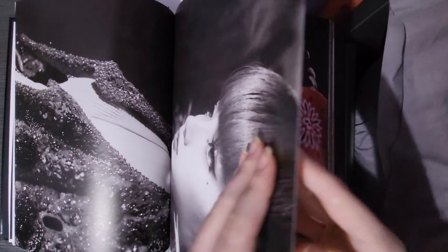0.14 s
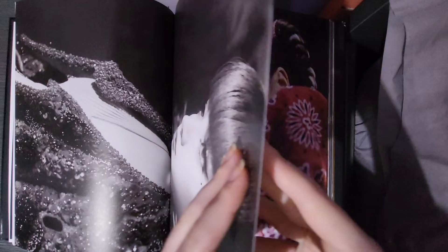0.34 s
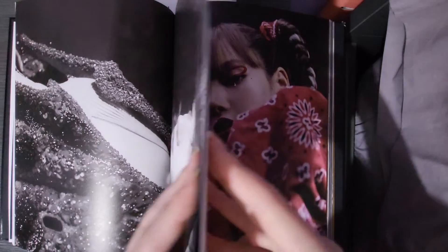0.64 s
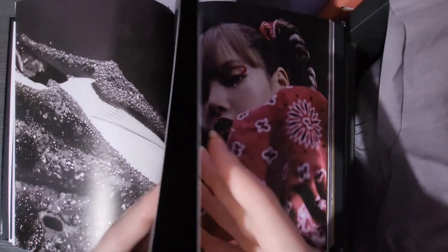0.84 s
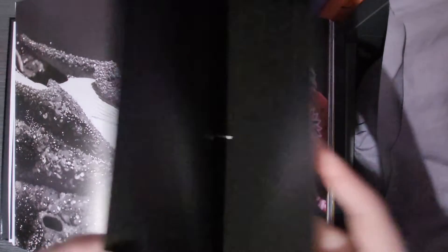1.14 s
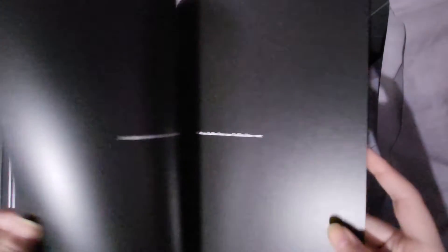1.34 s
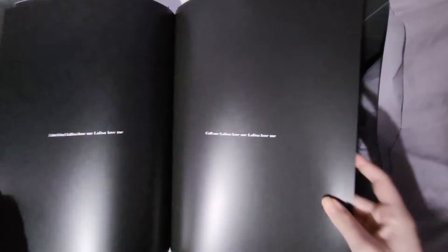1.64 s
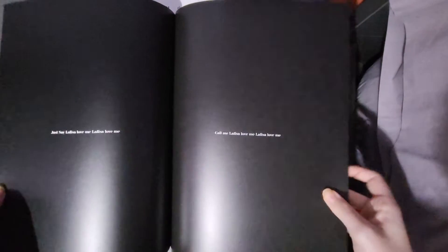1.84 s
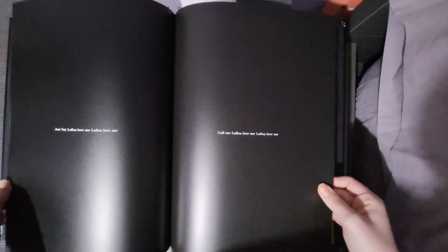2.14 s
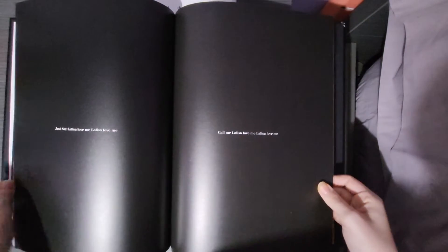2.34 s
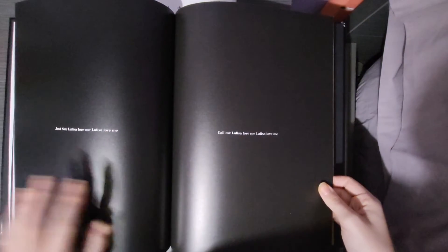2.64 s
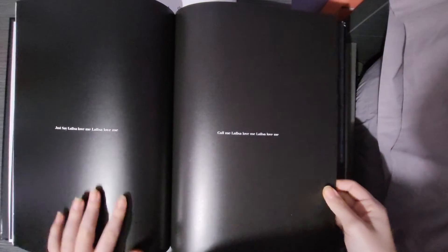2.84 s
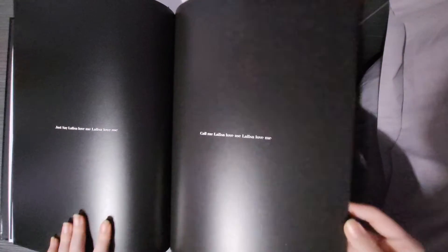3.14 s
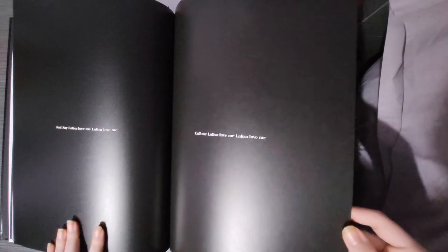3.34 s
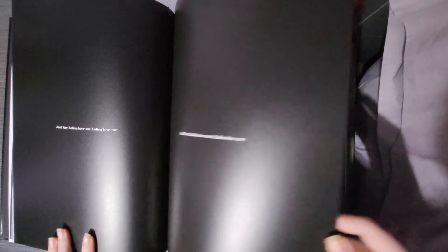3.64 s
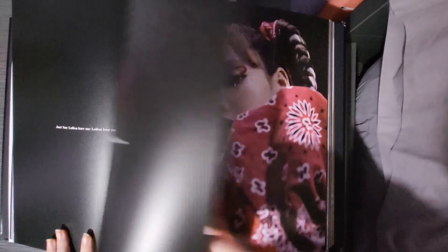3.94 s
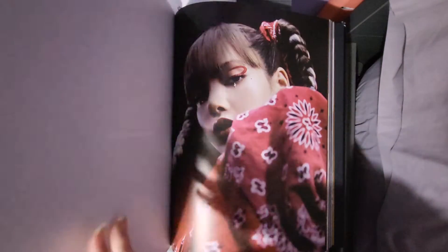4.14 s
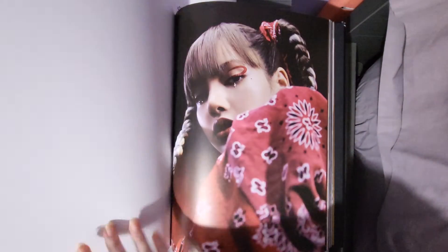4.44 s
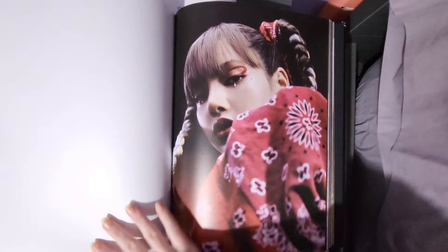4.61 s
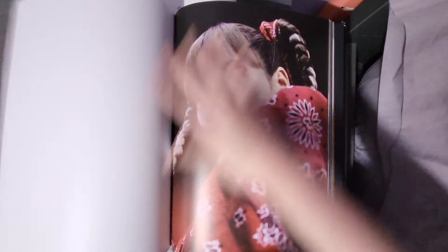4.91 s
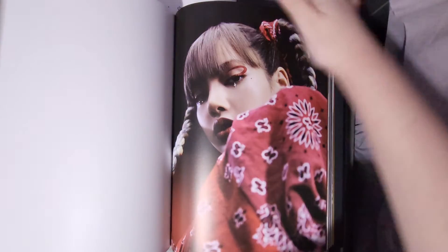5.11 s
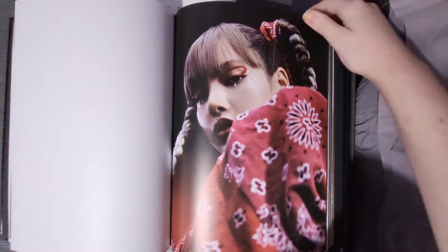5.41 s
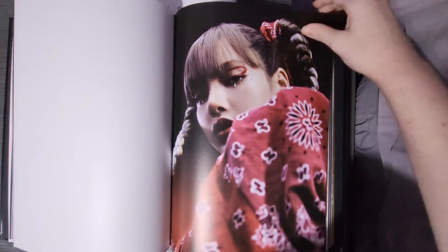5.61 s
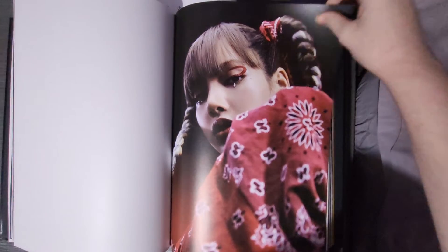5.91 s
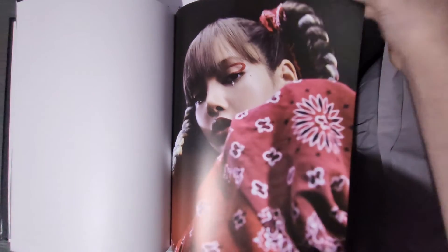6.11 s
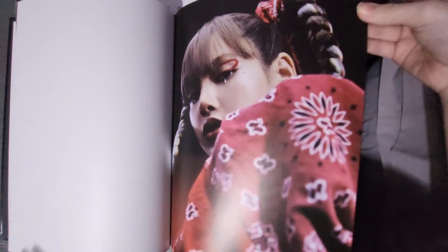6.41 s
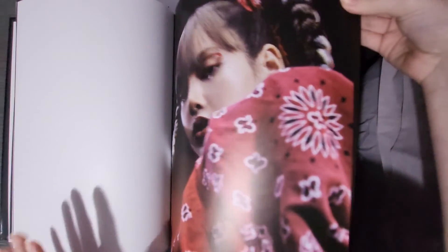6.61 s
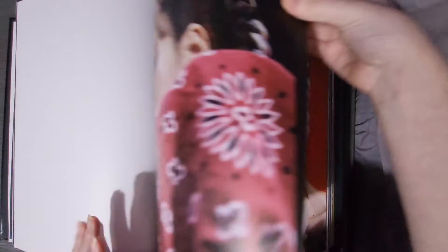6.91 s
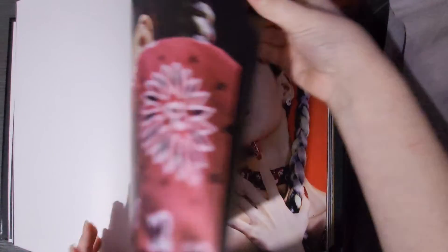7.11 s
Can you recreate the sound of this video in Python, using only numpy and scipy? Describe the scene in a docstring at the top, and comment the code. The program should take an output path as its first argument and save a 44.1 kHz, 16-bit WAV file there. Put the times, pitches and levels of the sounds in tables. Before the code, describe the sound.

Close stereo pickup of hands turning stiff glossy pages on a bed in a quiet room with faint hiss. An unsteady low hum swells under soft rubbing and small ticks and bends. A hard papery snap comes around three seconds, then a loud hollow flop just after four, followed by light finger strokes and a short falling peel swish near the end.

```python
"""Hands turn heavy glossy pages of a book on a bed, under a two-port microphone, in faint room hiss.
First a low, unsteady hum near 50 Hz swells and fades under soft strokes: rubbed gloss, as shaped noise.
Faint bends (lumpy noise, thumps), pops (short resonances) and ticks come early, stronger from about 1.2 s.
The sheet flexes hard at 3.1 s and flops down near 4.2 s with a hum swell; lighter handling follows.
Near 6.6 s one page peels off the next: a noise resonance slides down; small strokes end the scene."""
import sys
import numpy as np
from scipy import signal
from scipy.fft import rfft, irfft, next_fast_len
from scipy.io import wavfile
from scipy.ndimage import uniform_filter1d, map_coordinates

SR = 44100
rng = np.random.default_rng(int(sys.argv[2]) if len(sys.argv) > 2 else 0)


def waveform_to_disk(signal):
    """Save audio, clipped to [-1, 1], as 16-bit WAV at the path in sys.argv[1]."""
    frames = np.transpose(np.atleast_2d(signal))
    scaled = np.clip(frames, -1, 1) * 32767
    samples = np.round(scaled).astype(np.int16)
    wavfile.write(sys.argv[1], SR, samples)


N = 320166

# Levels and widths in the tables are nominal: each source adds its own fixed trim.
# Room spectrum: freq_hz, density_db_per_hz (relative)
ROOM_SPECTRUM = [(18, -33), (30, -3), (59, -10.5), (85, -14), (230, -43.5), (269, -33.5), (530, -33.5),
                 (707, -34.5), (918, -38), (5010, -45), (6340, -42), (7040, -41.5), (15400, -43.5)]
# Room correlation between the ports: freq_hz, likeness (-1 to 1)
ROOM_LIKENESS = [(60, 0.22), (240, 0.6), (950, 0.2), (3770, -0.59), (15000, 0.21)]
# Hum swells: start_s, hold_s, level_db, rise_s, fall_s, pitch_hz
HUM_SWELLS = [(0, 0, -46.5, .1, .2, 46.3), (0.326, 0.12, -56, .12, .1, 50.7),
              (0.551, 0.019, -47.5, 0.26, .12, 49.9), (0.68, 0.086, -48.5, .15, .08, 47.9),
              (0.886, .04, -52.5, .04, .064, 48), (1.149, 0, -59, .4, .1, 49.5),
              (1.27, 0.0044, -47, .2, .09, 50.9), (1.43, 0.019, -56, .16, .5, 48.2),
              (1.681, 0, -59, .4, .13, 49.4), (2.016, 0.043, -50, .11, .05, 49),
              (2.4, 0, -60.5, .13, .2, 49.2), (2.591, 0, -59, .12, .046, 49.3),
              (2.745, 0.14, -60, .045, .1, 49), (3.061, 0.27, -64, .03, .05, 50.5),
              (3.481, 0, -61.5, .08, .13, 53.8), (3.884, 0.048, -63.5, .2, .09, 50.8),
              (4.159, 0.051, -57.5, .1, .1, 55.3), (4.33, 0.0087, -37, .02, .04, 58.5),
              (4.591, 0, -66.5, .35, .6, 55.6), (5.296, .14, -71, 0.58, 0.034, 48.84),
              (5.82, 0, -64, 0.19, 0.048, 53.26), (5.99, 0, -65, 0.093, .24, 57.8),
              (6.53, 0, -66, 0.13, 0.19, 47.7), (6.75, 0.01, -69, .11, 0.12, 50.5),
              (6.96, 0, -61.5, 0.13, .12, 55.1), (7.14, 0, -70.5, 0.32, 0.063, 50.5)]
# Fingertips at the page edge: start_s, peak_db, treble_db (over peak), t60_s, left_right_db
EDGE_TICKS = [(0.4436, -93, -18, 0.033, -81), (0.6868, -60.5, 19, 0.087, -0.5),
              (0.848, -68.5, -41, 0.07, -19), (1.3139, -43.5, -33, 0.099, 3),
              (1.4259, -51.5, -37, 0.0713, 1), (1.744, -55.5, -4, 0.16, 2), (1.8078, -58, -16, 0.063, -3),
              (2.3814, -68, -23, 0.059, 13), (2.4223, -49.5, -5.5, 0.023, 0),
              (2.7826, -65.5, 17, 0.025, 11.5), (3.2414, -53, -22, 0.14, 9.5),
              (3.9639, -53.5, -19, 0.094, 1), (4.0647, -57, -11, 0.0693, 8),
              (4.0778, -44.5, -21, 0.035, -1), (4.135, -41, -1.5, 0.029, -5.5),
              (4.2849, -56.5, -6, 0.07, 6.5), (5.432, -66, 2.5, 0.087, 12), (5.7907, -68, 13, 0.064, 11),
              (6.0496, -65.5, 13, 0.034, 14.5), (6.1609, -53.5, -8, 0.1, 2),
              (6.1994, -48.5, -1.5, 0.026, 4), (6.2399, -50.5, -9.5, 0.07, 3.5), (7.0911, -70, 4, 0.07, 4)]
# Sheet pops: start_s, peak_db, pitch_hz, t60_s, left_right_db
SHEET_BUCKLES = [(0.441, -64, 153, 0.15, -12.5), (1.158, -58, 710, 0.069, 0), (1.315, -57, 138, 0.06, -19),
                 (1.419, -55, 145, 0.075, 7), (1.484, -56.5, 187, 0.043, 2.5), (1.568, -55, 126, 0.02, -5),
                 (1.779, -54.5, 435, 0.1, -6), (3.148, -31, 705, 0.1, 1.5), (3.164, -32.5, 712, 0.027, 8),
                 (3.207, -49.5, 680, 0.11, 4.5), (3.246, -47.5, 770, 0.042, -2),
                 (3.849, -55, 743, 0.11, -1), (3.959, -47.5, 435, 0.05, -2), (4.143, -28, 334, 0.038, -2),
                 (4.154, -19.5, 197, 0.11, 1), (4.216, -30.5, 140, 0.081, 3), (4.227, -37, 815, 0.05, 9.5),
                 (4.249, -38, 390, 0.075, 8), (4.267, -37.5, 328, 0.071, 7), (4.29, -39, 348, 0.12, -0.5),
                 (4.756, -62, 133, 0.14, -4), (4.917, -51.5, 355, 0.11, -10),
                 (7.214, -59.5, 736, 0.064, -2)]
# Pages part: start_s, hold_s, level_db, rise_s, fall_s
PAGE_PARTINGS = [(6.643, 0.11, -36.5, 0.036, 0.084), (6.845, 0.0069, -50, 0.02, 0.024)]
# Sheet bends: start_s, hold_s, body_db, rise_s, fall_s, centre_hz, thump_db (over body)
SHEET_BENDS = [(0, 0, -83.5, .01, .1, 900, 27.5), (.148, 0, -70.5, .09, .15, 960, 5.5),
               (.55, 0, -81.5, 3, 3, 1350, 8.5), (.842, 0.006, -83.5, .17, 0.47, 1046, -14),
               (1.172, 0, -51.5, .036, 0.176, 857, -36), (1.338, 0.024, -66, .3, .11, 1000, 3),
               (1.424, 0, -56, .01, .09, 800, -1), (1.574, 0.0081, -60.5, .006, .065, 730, 5.5),
               (1.786, 0.015, -58, .046, 0.076, 600, -3.5), (1.89, 0.26, -72, .05, .05, 1550, -6),
               (2.07, 0, -75.5, .05, .05, 333.5, 9.5), (2.41, 0, -77.5, .11, .14, 1596, -15),
               (2.834, .06, -71.5, .165, .116, 1457, -4), (3.076, 0.021, -69.5, .045, 0.17, 1444, 4.5),
               (3.142, 0.012, -34, .009, 0.044, 710, -15), (3.251, 0, -50.5, .04, .053, 796, -8.5),
               (3.32, 0.011, -82.5, .1, .15, 900, 5.5), (3.827, .11, -66.5, .1, .1, 750, 0),
               (3.981, 0, -59, .1, .1, 526, -12.5), (4.07, 0.036, -68, 0.055, 0.052, 1170, -4.5),
               (4.14, 0, -40, .002, .05, 524, 7), (4.164, 0, -40, .018, .058, 581, -12),
               (4.232, 0, -36, .06, .07, 554, -2.5), (4.29, 0.0098, -39, .014, 0.074, 374, -3.5),
               (4.716, 0, -76.5, .4, .6, 789, 10), (4.925, 0, -48.5, .008, 0.097, 420, -6.5),
               (4.99, .05, -59, .05, 0.039, 430, -21), (6.07, 0.094, -73.5, .07, .05, 1450, -9.5),
               (6.66, 0.15, -50, .06, .2, 967, -36), (6.72, 0.083, -48.5, .15, 0.053, 1240, -16.5),
               (6.9, 0, -63, .1, .25, 820, -0.5), (7.15, 0.0048, -80.5, .5, 0.21, 1465, -3),
               (7.235, .03, -73.5, .3, .1, 720, -3)]
# Sheet resonances over the book: centre_hz, width_hz, gain_db
SHEET_MODES = [(350, 52, 6.5), (719, 54, 2.5), (1124, 200, -12.5), (1630, 200, -11)]
# Rubbing: start_s, hold_s, swish_db, drift_db (over the hold), rise_s, fall_s, rasp_db (over swish),
# rasp_centre_hz, sheen_db (over swish), rasp_left_right_db
RUB_STROKES = [(0.101, 0.011, -77, 6, 0.41, .38, 1, 1753, -3, -1.5),
               (.445, 0.039, -79.5, -5, 0.029, .09, 4.5, 1880, 0, -5),
               (.693, 0.005, -75.5, -0.5, .06, .08, -3.5, 1580, 0.5, -2),
               (0.858, 0.2, -83, 14, 0.062, .3, -9.5, 1900, 7, -24),
               (1.135, 0.042, -67, 15, .13, .015, 1.5, 1998, -7.5, 3),
               (1.195, 0.13, -66, -1, .02, .15, 0.5, 2300, -6.5, 7.5),
               (1.424, 0, -67, 0.5, 0.01, .13, 6, 2340, -5.5, 4.5),
               (1.574, 0, -66.5, -0.5, 0.017, .08, 2, 1967, -12, 4),
               (1.773, 0.0079, -57, -0.5, 0.028, .09, -2.5, 2900, -4.5, 4),
               (1.862, 0.12, -72.5, 6.5, .3, .05, -2.5, 3200, -3.5, -4),
               (2.06, .12, -59, -7, .1, 0.054, 0.5, 2056, -1.5, -0.5),
               (2.388, .02, -74.5, 6.5, 0.0033, .05, -7, 3100, -1, 6),
               (2.421, 0, -64.5, 1.5, .04, .08, -6, 3400, -4.5, -4),
               (2.506, 0.32, -88, -2.5, .1, .1, -4.5, 2500, 2, 3),
               (2.788, 0.26, -63.5, -3.5, .025, .2, -10, 3600, -0.5, 1),
               (3.043, 0.012, -64, -0.5, .04, .03, 1, 3000, -7, -2),
               (3.08, 0.12, -63, 0.5, .2, .4, -10, 1529, -3, 0),
               (3.45, 0.31, -71.5, 1.5, 0.2, .03, -14.5, 2300, -4.5, -2),
               (3.973, 0.033, -73, -4, 0.19, 0.035, 1.5, 1886, -5.5, 1),
               (4.07, 0.0064, -74, 5, .03, .05, 9.5, 2250, -6, -1.5),
               (4.138, 0.012, -58.5, -3, .002, .04, -0.5, 1600, -4, 15),
               (4.164, 0.00093, -73.5, -2.5, 0.014, .076, 18.5, 1550, -6, 0),
               (4.194, .32, -72.5, 2, .03, .12, -6.5, 3200, -1.5, 0),
               (4.599, .09, -72.5, 2, .05, .1, -5, 2400, -6.5, 1),
               (4.754, 0.086, -66.5, 8, 0.07, .03, -15, 4060, -1.5, 1),
               (4.884, .054, -57.5, -1, 0.066, .023, -9, 3698, 7, 1.5),
               (4.96, 0.019, -74, 1, 0.011, .34, -9.5, 2700, -2.5, -1),
               (5.187, 0.099, -83.5, 2.5, .4, .65, -8.5, 3000, 0, -3),
               (5.785, 0.039, -87.5, -1.5, .06, .1, -6.5, 2800, -3, -3),
               (6.051, 0.081, -68.5, 4, 0.015, .033, -6, 3340, -6.5, 1.5),
               (6.2, 0.021, -61.5, 0, 0.0727, 0.11, -2.5, 2500, -4.5, -2),
               (6.262, 0.18, -67, 5, .05, 0.048, -19.5, 4180, -1.5, -2.5),
               (6.66, 0.044, -45.5, 1, .035, .11, -4, 2584, -12, -0.5),
               (6.76, .1, -64.5, -7.5, 0.16, .03, 11.5, 2301, -12.5, -11),
               (6.898, 0.14, -73, -1.5, .3, .05, 6, 3700, -10, 4),
               (7.083, 0.087, -69.5, -1, .012, .25, 3, 3300, -10, 1) ]
# Rubbing spectra, coarse to fine: freq_hz, density_db_per_hz (relative)
RASP_SPECTRUM = [(760, -35.5), (1300, -5.5), (1400, -5), (1680, 0), (1850, -8.5), (2000, -2), (2730, -4.5),
                 (3310, -4), (4600, -4.5), (5980, -29.5), (10100, -120)]
SWISH_SPECTRUM = [(2060, -38.5), (3500, -13), (3820, -3.5), (4440, 0), (6160, 0), (6590, 0), (7390, 2),
                  (8250, -8), (9000, -8), (11700, -25), (19800, -120)]
SHEEN_SPECTRUM = [(5000, -35), (8500, -4), (9270, 1), (12900, -4), (15400, -8.5)]
# Source position: time_s, left_lead_ms, side_over_mid_db
SOURCE_PATH = [(0, .21, -2.5), (.49, .22, 4), (.7, .39, -0.5), (1.3, -0.093, -1.5), (1.45, -.13, -5),
               (2.1, 0, -4.5), (3.7, 0.056, -2), (4.11, .2, -0.5), (4.13, .074, 6.5), (4.3, -.02, 3),
               (4.4, -.1, -3), (4.9, 0, -4.5), (5.6, -.1, -0.5), (6.2, -.05, 0), (6.4, .27, -2),
               (7.26, .2, -1.5)]
# Port mismatch, for swish and sheen: freq_hz, left_right_db
PORT_MISMATCH = [(60, 2), (110, 2), (200, -3.5), (380, 5.5), (700, 7), (1290, 8), (2380, 3), (4400, 2),
                 (8120, 4.5), (15000, -0.5)]

ROOM_DB, TOP_HZ = -78.5, 15450
HUM_REST_DB, HUM_REST_HZ = -78.21, 53
WAVER_DB, WAVER_HZ = 6.435, 1.8  # per unit of wobble
THUMP_REST_DB = -82  # the air never lies quite still under the hands
GAP_HZ, GAP_FALLS_HZ_PER_S, GAP_OPEN_HZ = 5300, 22000, 2843  # at first parting, fall, lowest
SHEEN_TILT_DB_PER_OCT_PER_DB = 0.46  # stronger sheen is brighter
SCATTER_RAD = 1.606  # pi / 2: side unrelated to mid
SWING_DB = 20  # crossed in one rise or fall time
CONTROL_HZ = 2000  # gesture rate


def amp(db):
    """Gain of a level in dB."""
    return 10 ** (np.asarray(db) / 20)


def unit(x):
    """Scale to rms 1."""
    return x / np.sqrt(np.mean(x ** 2) + 1e-20)


def along(points, hz):
    """Interpolate (Hz, value) points on a log axis."""
    point_hz, values = np.transpose(points)
    return np.interp(np.log(hz + 1), np.log(point_hz + 1), values)


def filtered(x, response):
    """Multiply the spectrum of x by a response of frequency."""
    size = next_fast_len(x.shape[-1] + 4096)
    spectrum = rfft(x, size) * response(np.fft.rfftfreq(size, 1 / SR))
    return irfft(spectrum, size)[..., :x.shape[-1]]


def resonance(hz, centre_hz, sharp):
    """Causal resonance of Q sharp, gain 1 at its centre."""
    damping = 1j * hz * centre_hz / sharp
    return damping / (centre_hz ** 2 - hz ** 2 + damping)


def noise(gain, patchy_db, grit_db, size=512):
    """Two unrelated noises, coloured by gain(Hz, s) at constant power, with long thin streaks and grit."""
    slips = unit(uniform_filter1d(rng.standard_normal(N), 90))  # about 2 ms long
    gritty = rng.standard_normal((2, N)) * amp(grit_db * slips)
    hz, t, z = signal.stft(gritty, SR, nperseg=size)
    shape = gain(hz[:, None], t) * np.ones(z.shape[1:])
    shape = shape / np.sqrt(np.mean(np.abs(shape) ** 2, 0))
    streaks = uniform_filter1d(rng.standard_normal(z.shape[1:]), size=4, axis=0)
    streaks = unit(uniform_filter1d(streaks, size=24, axis=1))
    z = z * shape * amp(patchy_db * streaks)
    return unit(signal.istft(z, SR, nperseg=size)[1][:, :N])


def placed(pair, wider_db, pan_db=0):
    """Mid and side become left and right; the nearer port hears first."""
    n = np.arange(N)
    time_s, lead_points_ms, side_points_db = np.transpose(SOURCE_PATH)
    lead_ms = np.interp(n / SR, time_s, lead_points_ms)
    side_db = np.interp(n / SR, time_s, side_points_db)
    turned = filtered(pair[0], lambda hz: 1j)  # mid, turned a quarter cycle
    # mostly unrelated noise, with a faint copy of the turned mid
    side = np.cos(SCATTER_RAD) * turned + np.sin(SCATTER_RAD) * pair[1]
    side = side * amp(side_db + wider_db)
    shift = lead_ms * SR / 2000  # half the lead per port, in samples
    left = map_coordinates(pair[0] + side, [n + shift], mode="nearest")
    right = map_coordinates(pair[0] - side, [n - shift], mode="nearest")
    return np.array([left * amp(pan_db / 2), right * amp(-pan_db / 2)])


def gestures(start_s, hold_s, level_db, rise_s, fall_s, drift_db=0):
    """Power of each gesture: rise, hold that may drift, fall; straight lines in dB."""
    t = np.arange(N * CONTROL_HZ // SR) / CONTROL_HZ - start_s[:, None]
    hold_s = np.maximum(hold_s, 1e-4)[:, None]
    before = np.clip(-t, 0, None) / np.maximum(rise_s, 1e-3)[:, None]
    after = np.clip(t - hold_s, 0, None) / np.maximum(fall_s, 1e-3)[:, None]
    drift = np.reshape(drift_db, (-1, 1)) * np.clip(t / hold_s, 0, 1)
    track_db = level_db[:, None] + drift - SWING_DB * (before + after)
    return 10 ** (np.maximum(track_db, -200) / 10)


def power_mean(power, values):
    """Mean of the gestures' values, weighted by power: the loudest prevails."""
    return values @ power / power.sum(0)


def at(track, t=None):
    """Read a gesture track at given times, or at every sample."""
    t = np.arange(N) / SR if t is None else t
    return np.interp(t, np.arange(len(track)) / CONTROL_HZ, track)


def wobble(knots_per_s):
    """Smooth random curve at the gesture rate."""
    knots = rng.standard_normal(40 * N // SR)
    position = np.arange(N * CONTROL_HZ // SR) * knots_per_s / CONTROL_HZ
    return map_coordinates(knots, [position])


def page(hz):
    """The sheet favours its resonances and radiates little above the last one."""
    peaks = 0
    for centre_hz, width_hz, gain_db in SHEET_MODES:
        peaks = peaks + amp(gain_db) * np.abs(resonance(hz, centre_hz, centre_hz / width_hz))
    return (0.58 + peaks) / (1 + (hz / 2100) ** 6)


def bursts(rows, colour, rise_s):
    """Short noise puffs, each with its own colour, decay and side."""
    out = np.zeros((2, 2, N + SR))  # port, mid / side, sample
    t = np.arange(SR // 4) / SR
    for start_s, peak_db, tone, t60_s, pan_db in rows:
        envelope = amp(-60 * t / max(t60_s, .004)) * (1 - np.exp(-t / rise_s))
        puff = filtered(rng.standard_normal((2, len(t))) * envelope, colour(tone))
        puff = amp(peak_db) * puff / np.abs(puff[0]).max()
        pan = amp(np.reshape([pan_db / 2, -pan_db / 2], (2, 1, 1)))
        out[:, :, round(start_s * SR):][..., :len(t)] += puff * pan
    return np.array([placed(out[k, :, :N], wider_db=-3.5)[k] for k in range(2)])


def room():
    """Steady noise above 65 Hz; its likeness at the two ports varies with frequency."""
    def colour(hz):
        turn = np.arccos(np.clip(along(ROOM_LIKENESS, hz), -1, 1)) / 2
        return amp(along(ROOM_SPECTRUM, hz)) * (hz > 65) * [np.cos(turn), np.sin(turn)]

    mid, side = filtered(rng.standard_normal((2, N)), colour)
    return amp(ROOM_DB) * unit(np.array([mid + side, mid - side]))


def hum():
    """A low tone swells, wavers in level and pitch between swells, and lags at the left port."""
    *shape, pitch_hz = np.transpose(HUM_SWELLS)
    power = gestures(*shape)
    rest = amp(2 * (HUM_REST_DB + WAVER_DB * wobble(5.5)))
    rest_hz = HUM_REST_HZ + WAVER_HZ * wobble(5)
    total = power.sum(0) + rest
    heard_hz = (pitch_hz @ power + rest * rest_hz) / total
    phase_rad = 2 * np.pi * np.cumsum(at(heard_hz)) / SR + np.array([[-.6], [.6]])
    return at(np.sqrt(2 * total)) * np.sin(phase_rad) * amp([[-.8], [.8]])


def ticks():
    """Fingertips catch and leave the page edge: puffs with a middle and a treble resonance."""
    def colour(treble_db):
        treble = amp(treble_db - 3.0)
        return lambda hz: resonance(hz, 1880, sharp=0.91) + treble * resonance(hz, 9000, sharp=1.0)

    return bursts(EDGE_TICKS, colour, rise_s=0.0004)


def buckles():
    """The stiff sheet pops between curves: a few cycles of one tone, the page's voice above it."""
    def colour(pitch_hz):
        def response(hz):
            above = page(hz) * (1j * hz / (.7 * pitch_hz + 1j * hz)) ** 3
            voice = resonance(hz, pitch_hz, sharp=6.6) + amp(-16.5) * above
            return voice / (1 + 1j * hz / 2600) ** 4
        return response

    return bursts(SHEET_BUCKLES, colour, rise_s=0.0048)


def peel():
    """The wedge of air between two parting pages sings lower as it opens."""
    def colour(hz, t):
        gap_hz = GAP_HZ - GAP_FALLS_HZ_PER_S * (t - PAGE_PARTINGS[0][0])
        gap_hz = np.clip(gap_hz, GAP_OPEN_HZ, 2 * GAP_OPEN_HZ)
        return np.abs(resonance(hz, gap_hz, sharp=3.6)) ** 2

    level = at(np.sqrt(gestures(*np.transpose(PAGE_PARTINGS)).sum(0)))
    air = amp(-5.0) * level * noise(colour, patchy_db=1.5, grit_db=3.0)
    return placed(air, wider_db=-3.5, pan_db=4.5)


def flex():
    """The bending sheet sounds in lumps around a moving centre and pushes out low thumps of air."""
    *shape, bend_hz, thump_db = np.transpose(SHEET_BENDS)
    power = gestures(*shape)
    centre_hz = 1.124 * power_mean(power, bend_hz)

    def body_colour(hz, t):
        band = np.abs(resonance(hz, at(centre_hz, t), sharp=0.66)) ** 2.6
        return page(hz) * band / (1 + (250 / (hz + 1)) ** 4)

    def thump_colour(hz, t):
        return np.abs(resonance(hz, 100, sharp=0.79)) ** 2

    lumps = noise(body_colour, patchy_db=.8, grit_db=2.5, size=1024)
    body = amp(-4.0) * at(np.sqrt(power.sum(0))) * lumps
    push = at(np.sqrt(amp(2 * thump_db) @ power + amp(2 * THUMP_REST_DB)))
    thump = push * noise(thump_colour, patchy_db=2.5, grit_db=2.5, size=2048)
    return placed(body, wider_db=-1.0, pan_db=-1.5) + placed(thump, wider_db=-2.5, pan_db=-2.5)


def slide():
    """Skin and page edges rub the gloss: a coarse rasp, a swish and a fine sheen."""
    (start_s, hold_s, swish_db, drift_db, rise_s, fall_s,
     rasp_db, rasp_hz, sheen_db, pan_db) = np.transpose(RUB_STROKES)
    power = gestures(start_s, hold_s, swish_db, rise_s, fall_s, drift_db)
    rasp_power = power * amp(2 * rasp_db)[:, None]
    centre_hz = power_mean(rasp_power, rasp_hz)
    tilt_db_per_oct = SHEEN_TILT_DB_PER_OCT_PER_DB * power_mean(power, sheen_db) + 2.5

    def swish_colour(hz, t):
        return amp(along(SWISH_SPECTRUM, hz))

    def sheen_colour(hz, t):
        tilt_db = at(tilt_db_per_oct, t) * np.log2((hz + 1) / 10000)
        return amp(along(SHEEN_SPECTRUM, hz) + tilt_db)

    def rasp_colour(hz, t):
        return amp(along(RASP_SPECTRUM, hz)) * np.abs(resonance(hz, at(centre_hz, t), sharp=0.86))

    def port_gain(hz):
        return amp(along(PORT_MISMATCH, hz) * [[.5], [-.5]])

    swish_level = amp(-2.5) * at(np.sqrt(power.sum(0)))
    swish = swish_level * noise(swish_colour, patchy_db=3.5, grit_db=0.55)
    sheen_level = at(np.sqrt(amp(2 * sheen_db) @ power))
    sheen = sheen_level * noise(sheen_colour, patchy_db=0.3, grit_db=0.9)
    rasp_level = at(np.sqrt(rasp_power.sum(0)))
    rasp = rasp_level * noise(rasp_colour, patchy_db=1.8, grit_db=2.5)
    fine = filtered(placed(swish + sheen, wider_db=3.5), port_gain)
    return fine + placed(rasp, wider_db=2.5, pan_db=at(power_mean(rasp_power, pan_db)))


def scene():
    """All sources together."""
    return room() + hum() + ticks() + buckles() + peel() + flex() + slide()


def record(dry):
    """The recorder keeps nothing above its band limit."""
    return filtered(dry, lambda hz: hz < TOP_HZ)


dry = scene()
out = record(dry)
waveform_to_disk(out)
```